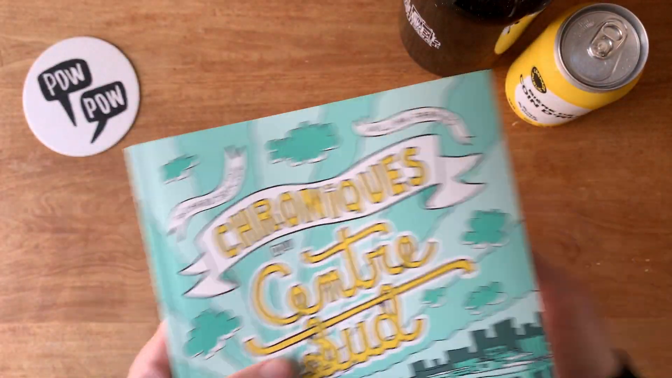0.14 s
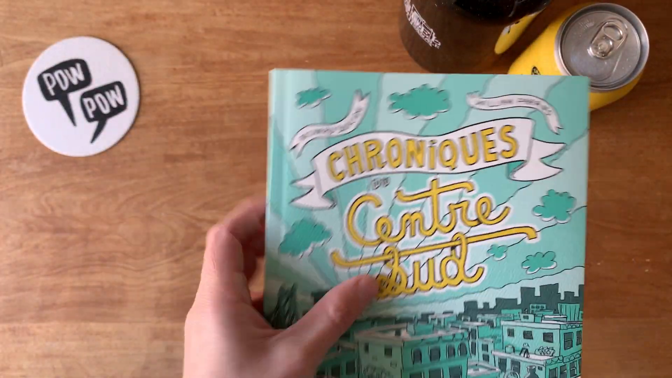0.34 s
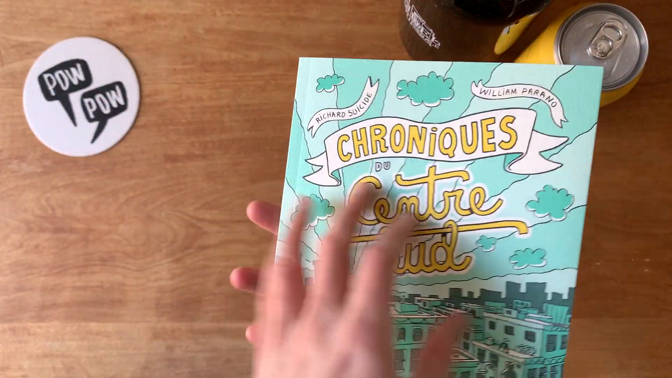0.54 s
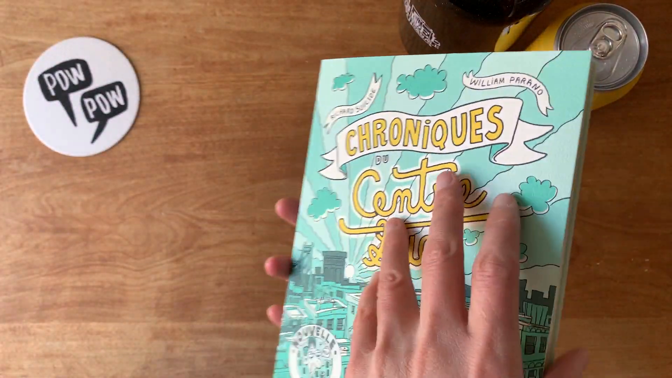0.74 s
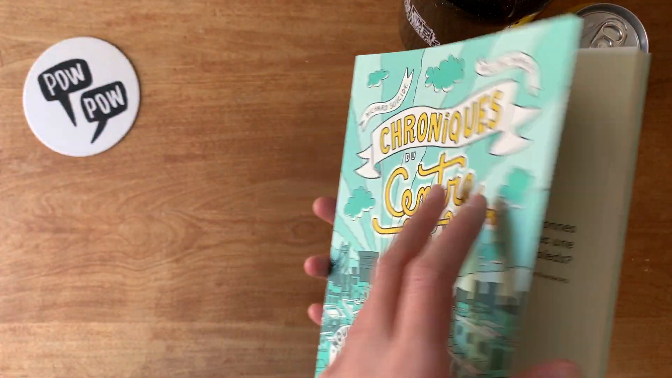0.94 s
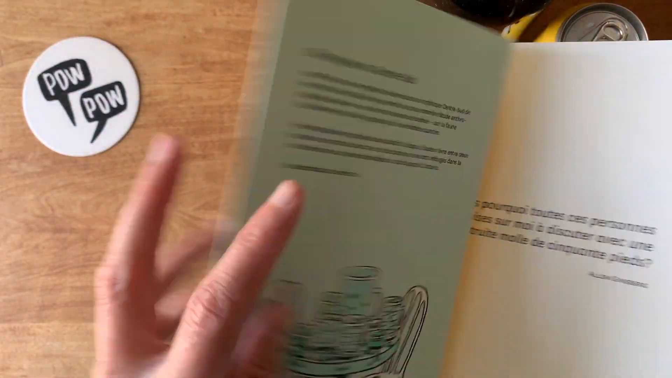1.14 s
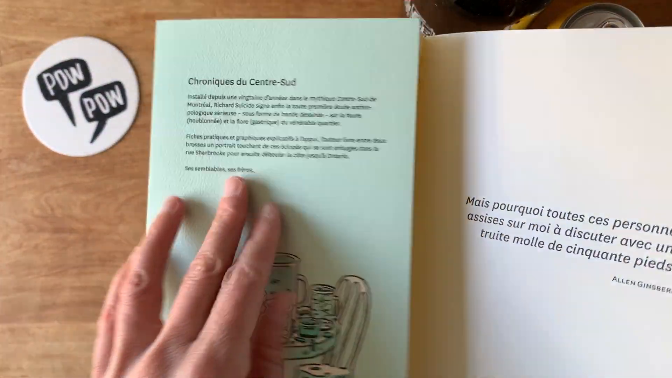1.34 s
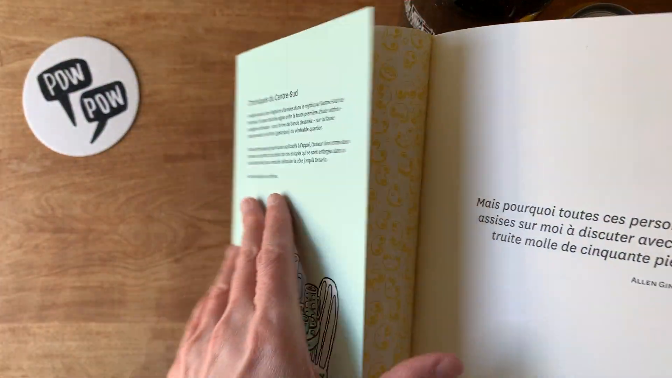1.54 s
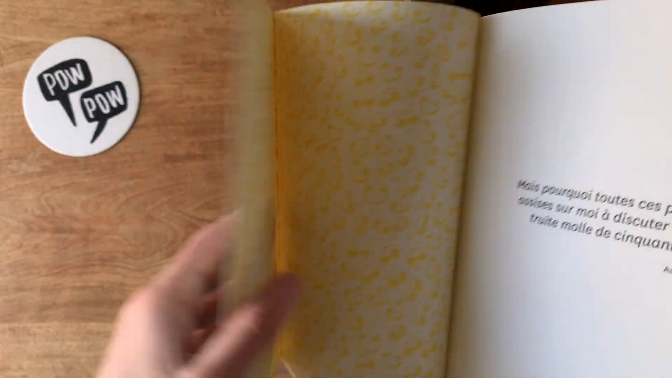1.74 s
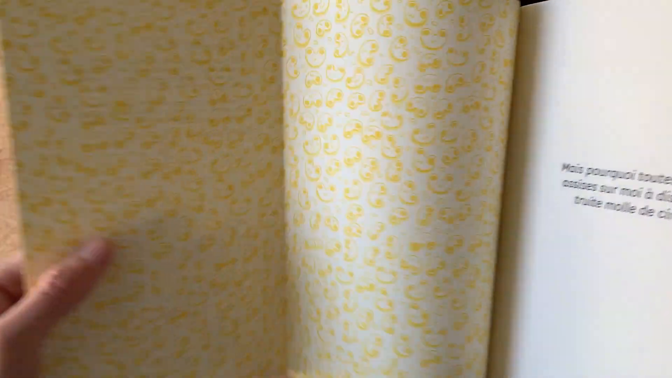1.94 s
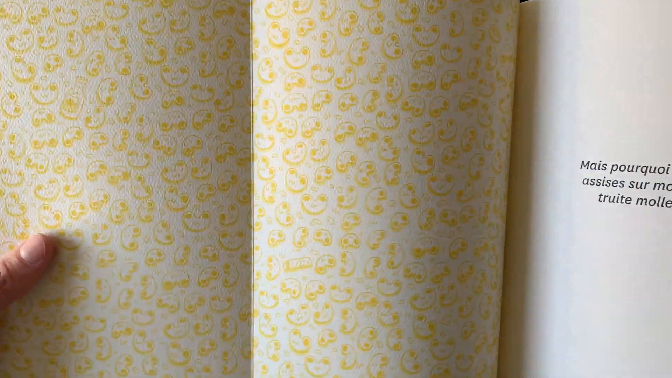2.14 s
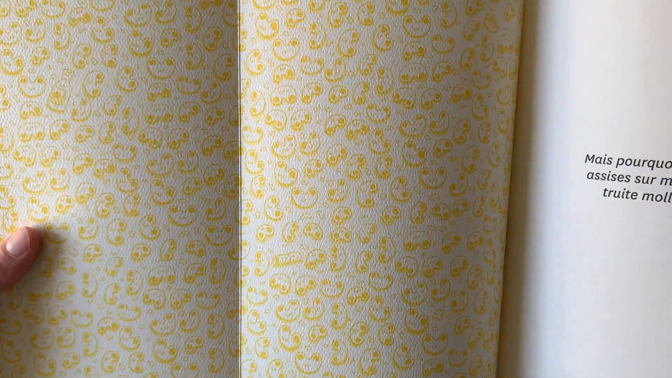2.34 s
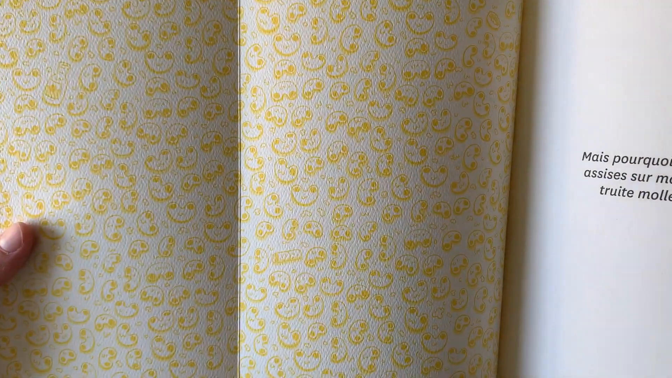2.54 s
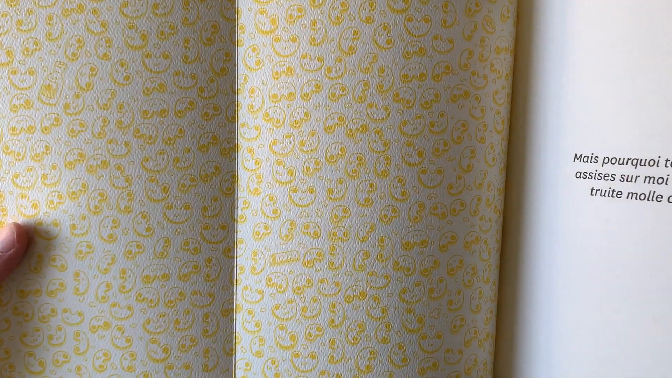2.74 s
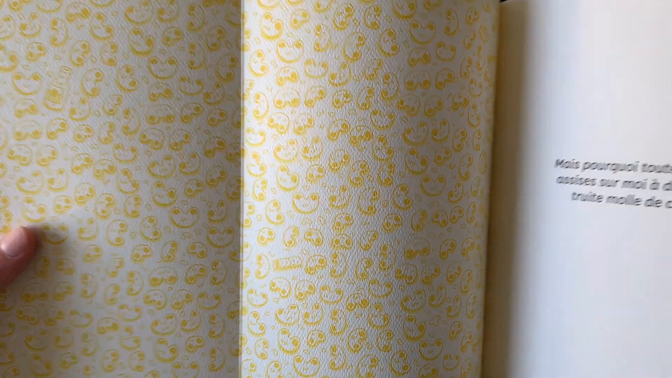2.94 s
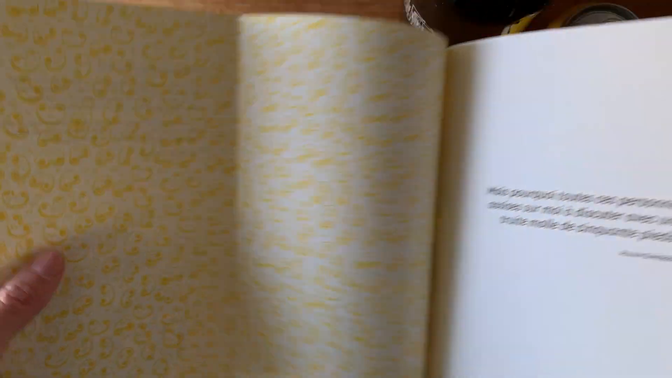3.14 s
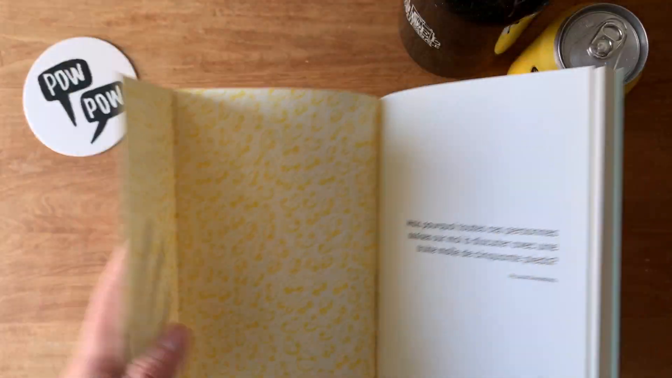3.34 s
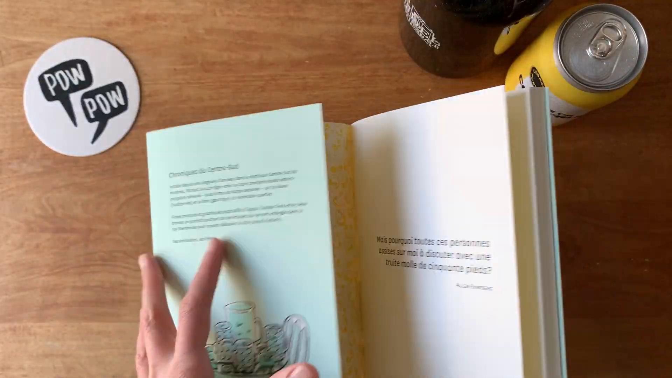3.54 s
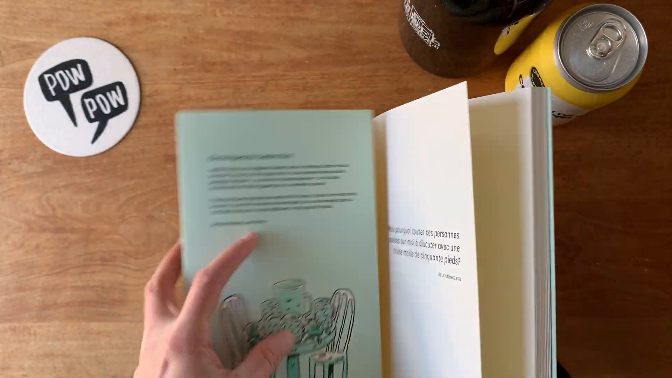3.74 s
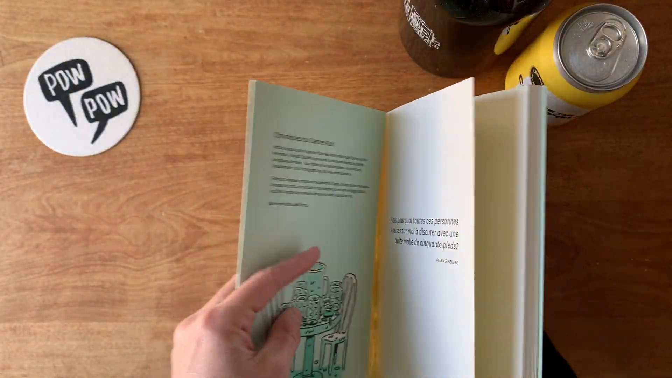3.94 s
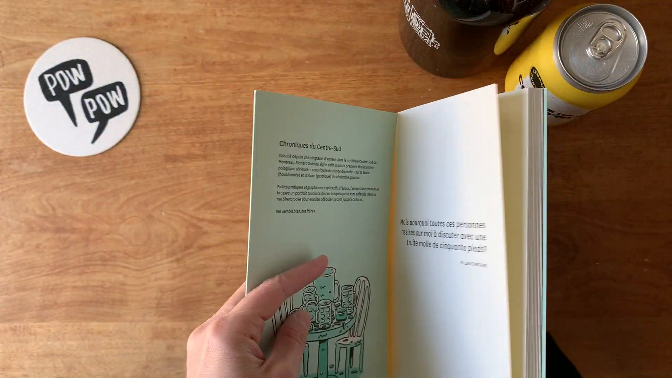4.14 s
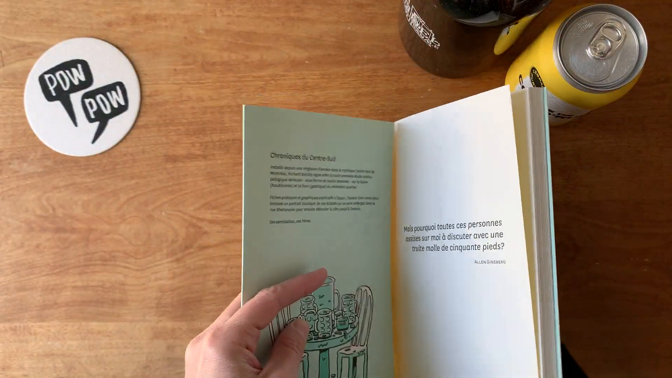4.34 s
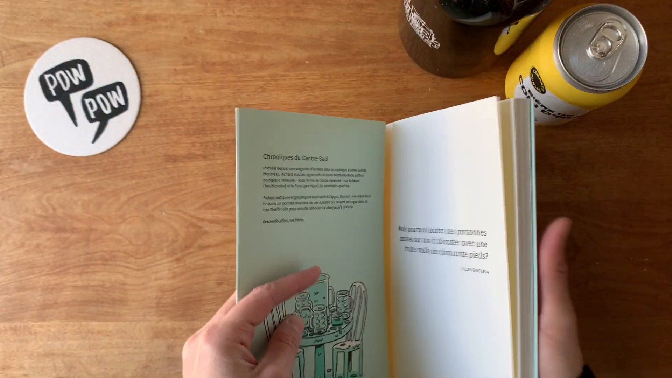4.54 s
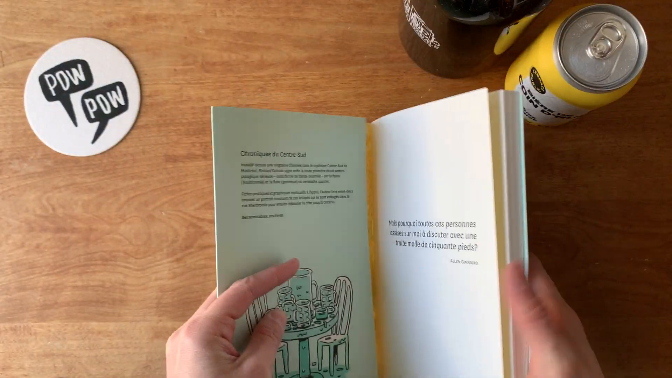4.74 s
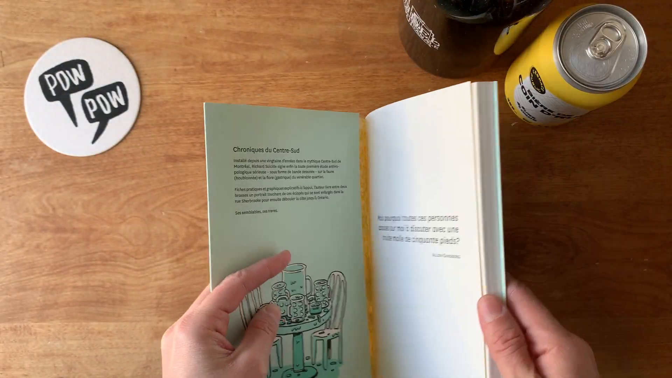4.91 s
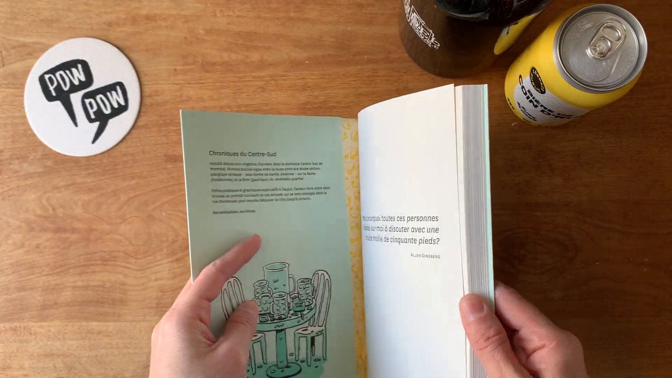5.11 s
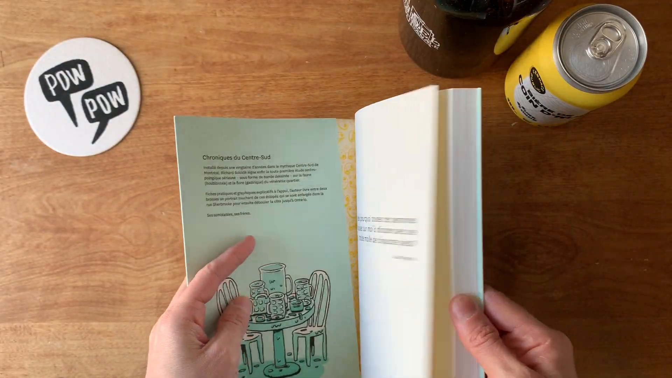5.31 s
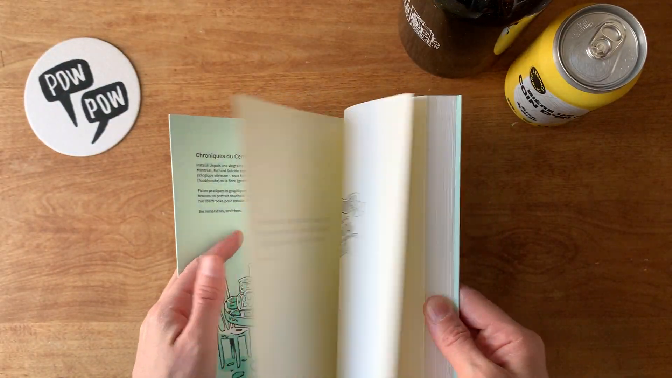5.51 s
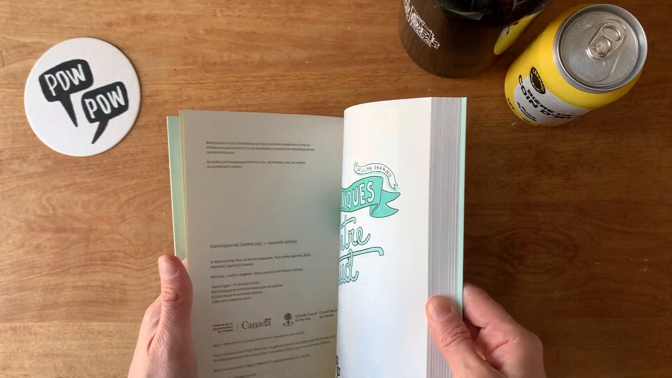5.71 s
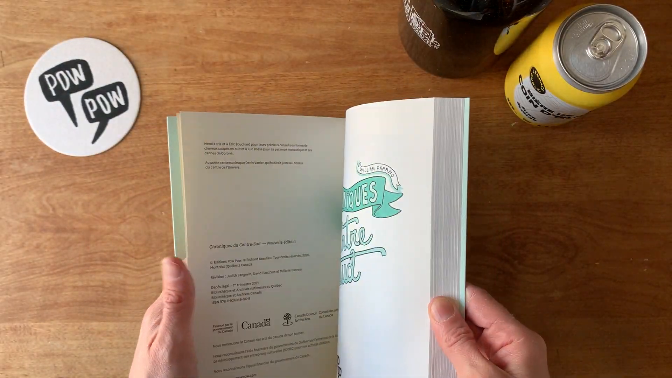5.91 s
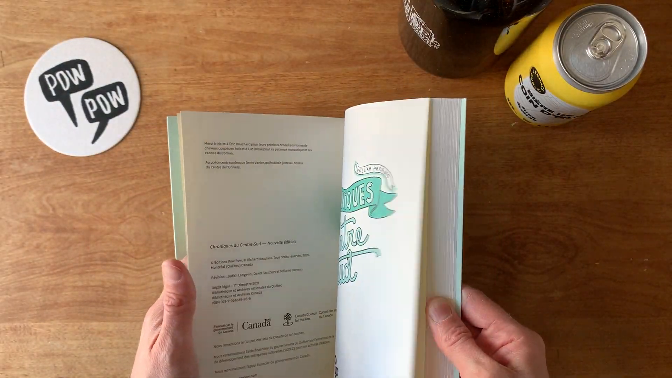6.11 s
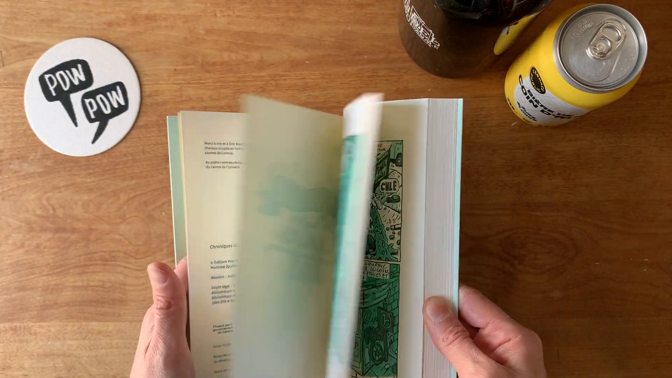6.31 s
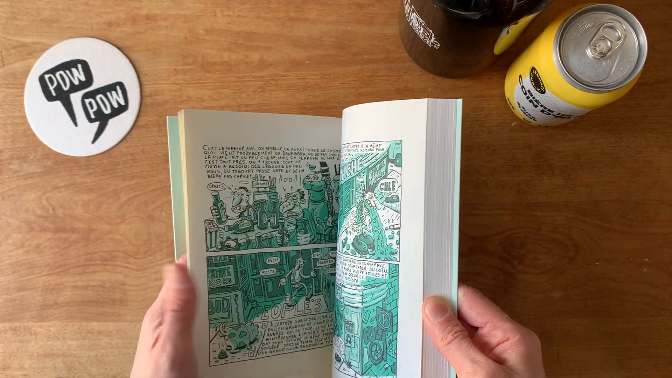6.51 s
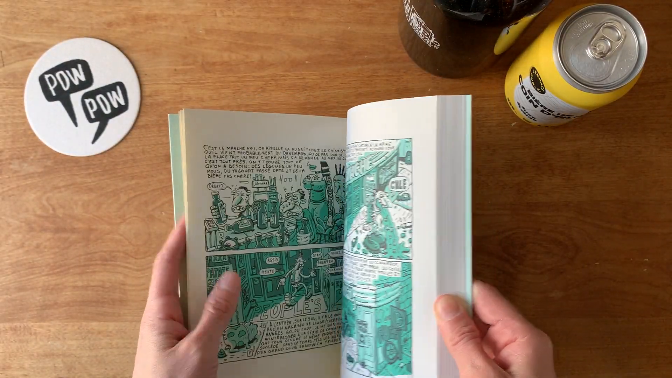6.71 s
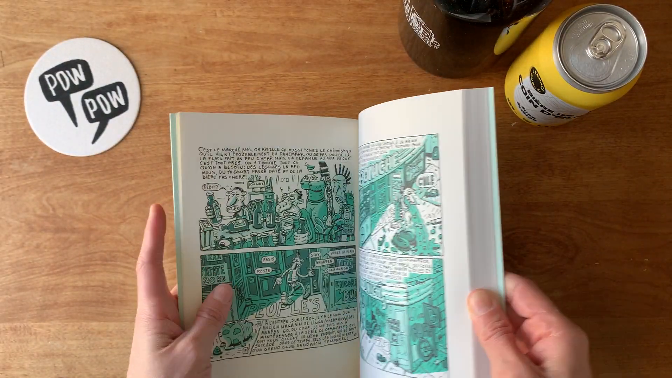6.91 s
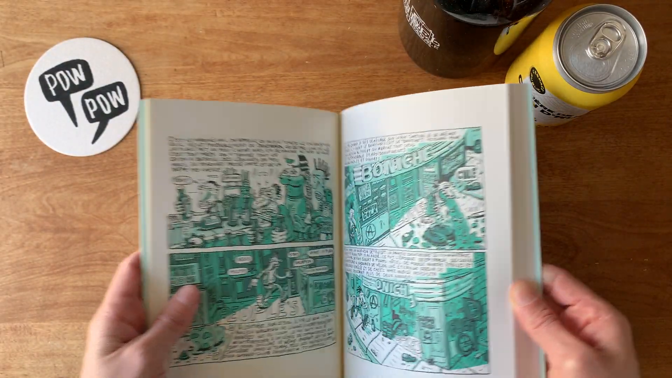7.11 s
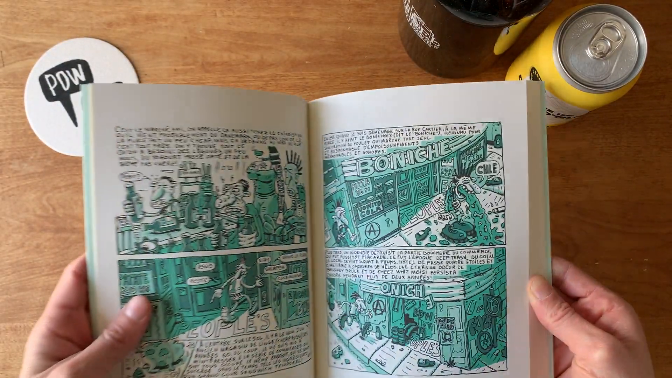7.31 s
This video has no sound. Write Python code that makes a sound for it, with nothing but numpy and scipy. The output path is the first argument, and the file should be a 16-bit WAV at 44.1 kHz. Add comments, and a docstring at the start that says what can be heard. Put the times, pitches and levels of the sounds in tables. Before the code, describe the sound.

Close stereo microphone in a small quiet room with a faint low hum. Fingers rub and brush a paperback's cover, the cover flops open, and pages slide and flap, crackling into a crisp snap about two seconds in. After a near-silent pause, rustling resumes; the book knocks hard on the wooden table, then single pages turn softly with small flaps.

```python
"""A soft rub of fingers on paper over a low hum comes first; then pages flick, slide and flap.
A paperback is opened and leafed through on a wooden table, close to a small stereo microphone.
Sliding is a dense train of tiny slips, coloured by paper and book; freed pages are short noise bursts.
The cover flops open and the book once knocks hard: dispersed thuds, with table and cover modes ringing.
A small room answers with near echoes and a diffuse tail."""
import sys
import numpy as np
from scipy import signal
from scipy.fft import rfft, irfft, next_fast_len
from scipy.io import wavfile

SR = 44100
rng = np.random.default_rng(int(sys.argv[2]) if len(sys.argv) > 2 else 0)


def bounce(signal):
    """Save signal as a 16-bit WAV file at the path given by the first command-line argument."""
    frames = np.transpose(np.atleast_2d(signal))
    limited = np.clip(frames, -1, 1)
    pcm = np.round(limited * 32767).astype(np.int16)
    wavfile.write(sys.argv[1], SR, pcm)


N = 328986
TIME = np.arange(N) / SR

# still room, spectrum of its noise: frequency_hz, level_db
ROOM_NOISE = [(20, -79), (50, -49.5), (90, -46.5), (135, -54), (185, -58), (250, -57.5), (330, -60),
              (470, -68), (650, -69.5), (900, -79.5), (1800, -77), (3800, -82), (6000, -82.5),
              (11500, -80.5), (15500, -88)]
# still room, partials of its hum: frequency_hz, level_db
HUM_PARTIALS = [(59.5, -69.5), (119.8, -69), (161.5, -72), (217.7, -76), (325, -85)]

# soft rub of the fingers while they handle the book: time_s, level_db
FINGER_RUB = [(0.0, -56), (0.56, -95), (0.91, -96), (1.27, -59), (1.99, -76), (2.35, -76.5), (3.05, -86),
              (3.26, -55.5), (3.91, -56), (4.2, -64), (4.45, -57.5), (4.71, -54.5), (5.77, -72),
              (5.88, -86.5), (6.44, -88), (6.77, -74), (7.21, -80), (7.46, -89.5)]
# what the rub sets off, relative to it: hiss_db, sheen_db, sheet_db, drag_db
RUB_LAYERS_DB = (-10, -11, 9.5, 12.5)
# strokes of a hand or page over paper, levels before the layer trims: fastest_at_s, speeding_up_s,
# slowing_down_s, hiss_db, sheen_db (the sheen's level is this plus twice the hiss), sheet_db, drag_db
STROKES = [(.25, 0.13, 0.048, -60.5, -13, -49, -45), (.305, 0.038, 0.12, -49.5, -7, -44.5, -57),
           (0.551, 0.17, 0.14, -44, 6, -44, -48), (0.597, 0.043, 0.036, -32.5, 19, -39.5, -37.5),
           (0.664, 0.1, 0.1, -37, 0, -46, -52), (.875, 0.097, 0.049, -51, -4, -48, -45.5),
           (1.025, 0.036, 0.037, -42, -12, -36, -48), (1.109, 0.05, 0.048, -34, -15, -30.5, -47),
           (1.325, 0.034, 0.036, -38.5, 29.5, -39, -42), (1.52, 0.12, 0.065, -40, 0.5, -41, -38.5),
           (1.586, 0.068, 0.024, -34.5, -5, -52, -53), (1.746, 0.15, 0.2, -40.5, 4, -50, -51),
           (1.841, 0.12, 0.084, -41, 5, -46, -40.5), (1.963, 0.036, 0.019, -37.5, -9, -36.5, -39),
           (2.06, 0.099, 0.098, -46, -10.5, -40.5, -43), (2.34, 0.016, 0.03, -69.5, -14, -56.5, -71),
           (3.06, 0.092, 0.047, -65, -19, -60.5, -52), (3.091, 0.015, 0.058, -48, -14.5, -43, -39),
           (3.25, 0.074, 0.24, -40.5, -5, -57, -44), (3.398, 0.0095, 0.089, -37, -22, -34.5, -34.5),
           (3.585, 0.16, 0.081, -40.5, 2, -44, -37), (3.811, 0.14, 0.06, -39.5, -5, -33.5, -38.5),
           (3.935, 0.033, 0.083, -41.5, -5, -35, -43), (4.045, 0.032, 0.02, -38, -7, -31, -50),
           (4.593, 0.06, 0.037, -36, -3, -34, -40), (4.74, 0.18, 0.21, -45.5, -2.5, -41, -41.5),
           (4.895, 0.088, 0.063, -48, -3, -38, -35), (5.07, 0.047, 0.21, -68, -10, -41.5, -48),
           (5.25, 0.022, 0.026, -54.5, -6, -46, -42), (5.324, 0.01, 0.015, -56, -10, -43.5, -67),
           (5.429, 0.035, 0.045, -65, -19.5, -42.5, -39.5), (5.809, 0.088, 0.049, -76, -20.5, -51, -48),
           (6.059, 0.048, 0.091, -74, -7.5, -57, -69), (6.636, 0.064, 0.033, -49, -17, -37, -52),
           (6.778, 0.042, 0.065, -48, -8, -40, -55.5), (6.88, 0.092, 0.036, -49, -16.5, -43.5, -46),
           (6.999, 0.091, 0.061, -69, -16, -43.5, -40)]
# speed at the two stroke times (dB re the fastest), and the powers that shape the two flanks
STROKE_ENDS_DB, SWELL_POWER, FADE_POWER = -10, 1.4, 1.35
# powers of the speed by which the layers grow: hiss, sheen, sheet, drag
LAYER_SPEED_POWERS = (1.51, 1.25, 1.13, 1.8)
# fibres snapping out of the hiss: mean rate, and level before colouring
CRACKLE_PER_S, CRACKLE_DB = 220, -14
# colours of the sliding layers: frequency_hz, gain_db
HISS_COLOUR = [(900, -23), (2000, -10), (2800, -9.5), (3900, -2.5), (6500, -1), (8500, -6.5), (11000, -5),
               (15000, -13)]
SHEEN_COLOUR = [(4500, -26.5), (7500, -6.5), (9800, 3), (12000, 3.5), (15500, 2.5)]
SHEET_COLOUR = [(250, -29), (500, -13), (800, -3), (1100, -6), (1800, -2), (2600, -3), (3600, -7),
                (7000, -28)]
DRAG_COLOUR = [(40, -4), (90, 2.5), (160, 3), (280, 1), (480, -7.5), (700, -8.5), (1400, -35.5)]
# pitch at which the sliding sheet sings, set by its free length: time_s, pitch_hz
SHEET_PITCH = [(0, 1500), (.65, 1400), (1.02, 1850), (1.13, 1750), (1.25, 1300), (1.55, 1100), (1.8, 1180),
               (2.1, 950), (3.1, 1020), (3.45, 1350), (3.8, 1000), (4.1, 1150), (4.8, 1100), (5.2, 1050),
               (6.1, 1300), (6.63, 1050), (6.85, 1500), (7.4, 1150)]
# resonances of the held pages: frequency_hz, width_hz, gain_db of the peak added to the plain sound
PAGE_RESONANCES = [(444.6, 40, 3), (645, 33, 4), (1025, 45, 3.5), (1250, 16, -8), (1830, 66, -10)]
# gap between the book's low and high resonances
PAGE_GAP_HZ, PAGE_GAP_WIDTH_HZ = 715, 67
# amplitude of the table's reflection against the direct paper sound
STROKE_MIRROR, FLICK_MIRROR = .27, .45

# page edges slipping free, levels before the layer trims: start_s, rise_s, decay_s,
# crack_db (edge), ping_hz (edge), flap_db (sheet), flap_hz (sheet)
FLICKS = [(.082, 0.0027, 0.0027, -51, 3130, -36, 1370), (.285, 0.0054, 0.011, -46.5, 4800, -33.5, 1350),
          (1.181, 0.0051, 0.019, -42, 3900, -31, 1350), (1.287, 0.00045, 0.018, -47.5, 4540, -32, 1390),
          (1.4, 0.0011, .006, -56, 4000, -37, 1100), (1.474, 0.001, 0.019, -39.5, 4060, -38.5, 1250),
          (1.539, 0.022, 0.023, -36.5, 4770, -27, 1040), (1.877, 0.0008, 0.005, -35, 4940, -39.5, 990),
          (1.94, .002, 0.01, -40, 3030, -51, 1250), (1.992, 0.00069, 0.0073, -29, 4840, -27, 1170),
          (2.037, 0.00088, 0.008, -27.5, 2900, -23.5, 1220),
          (2.087, 0.0025, 0.0041, -31, 4110, -23.5, 1090), (2.094, 0.0013, 0.0028, -35, 6370, -27, 990),
          (2.1028, 0.0011, 0.0015, -19.5, 6460, -22.5, 1190), (2.107, 0.0016, 0.0078, -40, 6800, -29, 1250),
          (2.206, 0.003, 0.0037, -53, 3600, -45.5, 1030), (3.386, 0.0037, 0.0076, -38.5, 3390, -39, 1492),
          (3.462, 0.0018, 0.0059, -58, 3400, -37, 1300), (3.505, 0.011, 0.012, -34.5, 2730, -30.5, 1270),
          (3.597, 0.0048, 0.0043, -65, 4000, -32, 1000), (3.726, 0.0026, .008, -56, 3600, -36.5, 1110),
          (3.788, 0.0031, 0.0066, -49, 3600, -25, 880), (4.028, .003, 0.0063, -39.5, 3400, -41, 1400),
          (4.083, 0.0027, 0.0053, -42.5, 4060, -36, 1340), (4.092, 0.0021, 0.024, -79, 3000, -29, 1020),
          (5.049, 0.0018, .008, -56, 6000, -34.5, 1040), (5.061, 0.00092, 0.0098, -52.5, 5900, -33.5, 1000),
          (5.613, 0.0054, 0.021, -43, 3810, -34.5, 1170), (5.626, 0.0057, 0.0089, -46, 4000, -27.5, 1110),
          (5.639, 0.0098, 0.012, -37, 4010, -28, 950), (5.681, 0.0012, 0.005, -35.5, 3640, -28.5, 1290),
          (5.686, 0.0028, 0.019, -44.5, 3450, -19.5, 970), (5.728, 0.011, 0.024, -72, 3040, -29, 915),
          (5.77, .004, 0.029, -50, 3270, -51, 1500), (5.7924, 0.00055, 0.00076, -27, 3230, -23, 1697),
          (5.795, 0.0034, 0.0067, -41.5, 3320, -45, 1720), (6.286, 0.0013, 0.0028, -52.5, 3530, -56, 980),
          (6.476, 0.0054, .012, -81, 3020, -53.5, 620), (6.494, 0.0018, 0.019, -74, 3020, -41.5, 520),
          (7.171, 0.0022, 0.0084, -66, 3000, -48.5, 1205), (7.312, 0.0065, 0.022, -62, 4110, -42.5, 1236),
          (7.345, 0.005, 0.0084, -64, 4000, -46.5, 1300), (7.386, 0.0035, 0.02, -58.5, 4100, -42, 1060)]
# colour of a page edge's crack: frequency_hz, gain_db
CRACK_COLOUR = [(700, -9), (1800, -6.5), (3500, -1.5), (6800, -2.5), (10000, -5), (13000, -12.5),
                (16000, -15.5)]
# colour of a flapping sheet: multiple_of_flap_pitch, gain_db
FLAP_COLOUR = [(.08, -21), (0.201, -9.5), (.33, -6), (.5, -2.5), (.7, -2.5), (1, 2), (1.35, -2),
               (1.848, -5.5), (2.999, -20), (5.999, -44)]

# book meeting table and cover buckling: time_s, blow_db, softness_corner_hz, cover_db, cover_pitch_hz
BLOWS = [(0.292, -28, 258, -45.5, 425), (1.199, -44, 328, -39, 377), (1.225, -44, 258, -37, 372),
         (1.287, -44.5, 600, -38.5, 418), (1.89, -60, 900, -50, 428), (1.958, -54.5, 698, -44, 424),
         (1.989, -44, 500, -41.5, 403), (2.035, -61.5, 1503, -41, 390), (2.085, -58, 1200, -38.5, 425),
         (2.103, -48, 450, -24.5, 426), (4.431, -25.5, 415, -49.5, 410.5), (4.45, -30, 110, -51, 400),
         (4.467, -21, 130, -42.5, 400), (4.5884, -8, 5070, -23.5, 448), (4.5952, -21.5, 1620, -29, 443.6),
         (5.446, -46, 502, -45, 428), (5.689, -53, 450, -41, 444), (6.491, -49, 800, -50.5, 443),
         (7.029, -61, 495, -55, 316)]
# thud of the book on the table, its peak later scaled to 1: frequency_hz, relative_db
THUD_COLOUR = [(24, -58.5), (40, -17), (90, -5.5), (160, -25.5), (235, -17), (320, -3), (500, -2),
               (650, -4), (850, 5), (1300, -4), (1850, -4.5), (2650, -13.5), (3800, -23), (7000, -41)]
# modes of the table top: frequency_hz, level_db (added to the blow), t60_s
TABLE_MODES = [(39.18, -52.5, .7), (88, -27.5, .38), (233, -33, 0.22), (308, -24.5, 0.28),
               (490, -28.5, 0.22), (562.3, -29.5, 0.23), (607, -29, 0.33), (712, -33, 0.39),
               (760.6, -24.5, .23), (850, -25, 0.29), (890, -29.5, .2), (988, -24, 0.17), (1126, -38, .3),
               (1254, -29.5, 0.25), (1427, -33, 0.31), (1426, -35.5, 0.74), (1760, -32, .22),
               (2060, -41, .4), (2090, -39, .5)]
# modes of the cover: multiple_of_cover_pitch, level_db (added to cover_db), t60_s before relaxation
COVER_MODES = [(.27, -11.5, .13), (.48, -20, .08), (.64, -9, 0.09), (.76, -10.5, .06), (.92, -8, .09),
               (1, -1, .11), (1.96, -6, .06)]
# a freshly buckled cover is stiffer: share by which its pitch starts sharp, and its relaxation time
COVER_SHARP, COVER_RELAX_S = .13, .012

# sheet juddering under the finger: loudest_at_s, half_length_s, level_db, pitch_hz, glide_octaves_per_s
JUDDERS = [(.54, 0.013, -52.5, 1350, 1), (1.108, 0.02, -42.5, 1810, -1.1),
           (1.136, 0.0082, -45, 1020, -0.28), (1.49, 0.07, -56.5, 1070, -0.37),
           (1.573, 0.026, -37, 1086, -1.1), (1.76, 0.09, -59.5, 1118, -1.1),
           (1.966, 0.0098, -46.5, 2570, 0.35), (3.41, 0.036, -55.5, 1527, -2.2),
           (3.795, 0.034, -58, 1400, -3.3), (5.587, 0.01, -63.5, 1480, 0.25), (6.635, 0.041, -52, 3200, 0),
           (6.85, 0.066, -59, 3300, 0.71)]
# resonances of the juddering sheet, before each is divided by root multiple: multiple_of_pitch, gain_db
JUDDER_RESONANCES = [(.42, -10), (1.002, 5.5), (1.145, -0.5), (1.65, -11.5)]
JUDDER_WIDTH = 0.044  # share of the resonance's frequency

# near reflections: delay_s, level_db
NEAR_ECHOES = [(.0031, -15), (.0052, -18.5), (.0074, -17.5), (.0093, -11.5), (0.0117, -15.5),
               (.0166, -23.5)]
# decay of the diffuse tail: frequency_hz, t60_s
TAIL_T60 = [(80, .42), (300, .36), (1000, .28), (3000, .34), (7000, .25), (15000, .16)]
# level of the diffuse tail: frequency_hz, level_db
TAIL_LEVEL = [(80, 2), (300, -3), (1000, -5.5), (3000, -9), (7000, -24), (15000, -15.5)]
ROOM_APART = 1.2  # tail that differs between the ports, against the tail they share

# phase by which the left microphone port leads the right: frequency_hz, lead_rad
PORT_LEAD = [(0, 0), (130, .3), (300, 0), (620, -1.4), (1000, -1.1), (1400, 0), (2500, 1.5), (3600, 1.4),
             (4750, 3.14), (9050, 9.42), (13300, 15.7), (16000, 19.7)]
# level of the left port minus the right: frequency_hz, difference_db
PORT_LEVEL = [(80, 1.5), (170, 5), (400, 8), (600, 1.5), (850, -1.5), (2400, -2), (3400, 0), (6000, 0)]
EDGE_HZ = 16050  # upper band limit


def gain_of(db):
    """Logarithmic level: converts decibels to amplitude."""
    return 10 ** (np.asarray(db) / 20)


def evened(x):
    """Mean-square normalisation: scales a signal to unit power."""
    return x / np.sqrt(np.mean(x ** 2) + 1e-20)


def read(points, hz):
    """Logarithmic frequency scale: joins (Hz, value) points by straight lines on it."""
    f, value = np.transpose(points)
    return np.interp(np.log(hz + 1), np.log(f + 1), value)


def add(mix, s, sound):
    """Superposition: adds a sound into the mix from time s."""
    part = mix[max(round(s * SR), 0):][:len(sound)]
    part += sound[:len(part)]


def colour(x, spectrum, size=4096):
    """Minimum phase: a causal filter whose phase follows from its log gain by the Hilbert transform."""
    hz = abs(np.fft.fftfreq(size, 1 / SR))
    log_gain = np.log(gain_of(read(spectrum, hz)))
    kernel = np.fft.ifft(np.exp(np.conj(signal.hilbert(log_gain)))).real
    return signal.oaconvolve(x, kernel[:size // 2])[:len(x)]


def wander(rate_hz):
    """Band-limited chance: smooth noise of unit power, up to about the given rate."""
    hz = np.fft.rfftfreq(N, 1 / SR)
    smooth = rfft(rng.standard_normal(N)) * np.exp(-(hz / rate_hz) ** 2)
    return evened(irfft(smooth, N))


def resonate(x, hz, width):
    """Heterodyne resonance: a one-pole filter, turned up to a pitch that may follow a curve; peak gain 1."""
    turn = np.exp(2j * np.pi * np.cumsum(hz * np.ones(len(x))) / SR)
    r = np.exp(-np.pi * width / SR)
    envelope = signal.lfilter([1 - r], [1, -r], x / turn + 1e-18)
    return 2 * (turn * envelope).real


def slips(per_s, spread_db):
    """Stick-slip: fibres let go in random clicks; positive spread makes a few large, negative a few small."""
    size = gain_of(spread_db * np.minimum(rng.exponential(1, N), 4))
    let_go = rng.random(N) < per_s / SR
    return evened(size * rng.choice([-1., 1.], N) * let_go)


def stillness(apart=0.27):
    """Ambient noise: partly shared by the two channels, under a faint hum that wavers in level and phase."""
    shared = colour(rng.standard_normal(N), ROOM_NOISE)
    unlike = colour(rng.standard_normal(N), ROOM_NOISE)
    unlike = apart * signal.lfilter(*signal.butter(1, 200, "high", fs=SR), unlike)
    hum = np.zeros(N)
    for hz, db in HUM_PARTIALS:
        hum += gain_of(db + 1.8 * wander(3)) * np.sin(2 * np.pi * hz * TIME + .4 * wander(2))
    return np.array([shared + unlike, shared - unlike]) + hum


def stroke_speed(t, speeding_s, slowing_s):
    """Kinematics of a stroke: the hand gathers speed up to t = 0, then slows towards rest."""
    before = np.maximum(-t, 0) / speeding_s
    after = np.maximum(t, 0) / slowing_s
    return gain_of(STROKE_ENDS_DB * (before ** SWELL_POWER + after ** FADE_POWER))


def friction():
    """Power addition: strokes and soft finger rub give the four layer levels in dB."""
    rub_db = np.interp(TIME, *np.transpose(FINGER_RUB))
    power = np.outer(gain_of(RUB_LAYERS_DB), gain_of(rub_db)) ** 2
    for s, speeding_s, slowing_s, hiss_db, sheen_db, sheet_db, drag_db in STROKES:
        during = slice(*np.searchsorted(TIME, [s - 3 * speeding_s, s + 3 * slowing_s]))
        speed = stroke_speed(TIME[during] - s, speeding_s, slowing_s)
        for layer, db in enumerate([hiss_db, hiss_db + sheen_db, sheet_db, drag_db]):
            power[layer, during] += (gain_of(db) * speed ** LAYER_SPEED_POWERS[layer]) ** 2
    return 10 * np.log10(power)


def pages(x):
    """Body resonance: the held sheets favour a few narrow bands, with a gap between the low and the high."""
    x = signal.lfilter(*signal.iirnotch(PAGE_GAP_HZ, PAGE_GAP_HZ / PAGE_GAP_WIDTH_HZ, SR), x)
    out = x.copy()
    for hz, width, db in PAGE_RESONANCES:
        out += gain_of(db) * signal.lfilter(*signal.iirpeak(hz, hz / width, SR), x)
    return out


def off_table(x, delay_s, drift, share):
    """Comb interference: the table mirrors the sound over a path that changes as the page moves."""
    late = delay_s * np.exp(drift * wander(1.5))
    mirrored = np.interp(TIME - late, TIME, x)
    return (x + share * mirrored) / np.hypot(1, share)


def sliding():
    """Stick-slip friction: slips hiss at the contact and shake sheet and book; juddering grip clumps them."""
    hiss_db, sheen_db, sheet_db, drag_db = friction()
    grip = gain_of(2.0 * wander(28) + 1.1 * wander(300))
    fine = grip * slips(per_s=5000, spread_db=0.55)
    coarse = grip * slips(per_s=1500, spread_db=2.0)
    glossy = grip * slips(per_s=22000, spread_db=-1.5)
    crackle = gain_of(CRACKLE_DB) * slips(per_s=CRACKLE_PER_S, spread_db=1.0)
    hiss = colour((fine + crackle) * gain_of(hiss_db), HISS_COLOUR)
    # the hiss level counts again, so the sheen rises more steeply with it
    sheen = colour(glossy * gain_of(hiss_db + sheen_db), SHEEN_COLOUR)
    sheet = pages(colour((coarse + 2 * crackle) * gain_of(sheet_db - 5.0), SHEET_COLOUR))
    singing = resonate(sheet, np.interp(TIME, *np.transpose(SHEET_PITCH)), width=160)
    sheet = sheet + gain_of(-1.5) * singing
    drag = pages(colour(slips(per_s=900, spread_db=2.0) * gain_of(drag_db - 3.5), DRAG_COLOUR))
    paper = off_table(hiss + sheen + sheet, delay_s=0.000905, drift=.25, share=STROKE_MIRROR)
    return gain_of(0.1) * (paper + drag)


def flicking(size=7000):
    """Impulsive release: an edge scrapes free and pings; its sheet flaps, lower when it is larger."""
    edge, sheet, t = np.zeros(N), np.zeros(N), np.arange(size) / SR
    scrape = slips(per_s=15000, spread_db=0.0)
    flutter = slips(per_s=14000, spread_db=-0.2)
    for k, (s, rise, decay, crack_db, ping_hz, flap_db, flap_hz) in enumerate(FLICKS):
        burst = np.minimum(t / rise, 1) * np.exp(-np.maximum(t - rise, 0) / decay)
        crack = colour(burst * scrape[k * size:][:size], CRACK_COLOUR)
        ping = gain_of(7.5) * resonate(crack, ping_hz, width=490)
        add(edge, s, gain_of(crack_db) * (crack + ping))
        shape = [(factor * flap_hz, db) for factor, db in FLAP_COLOUR]
        flap = colour(burst * flutter[k * size:][:size], shape)
        add(sheet, s, gain_of(flap_db) * flap)
    edge = off_table(edge, delay_s=.0004, drift=0.33, share=FLICK_MIRROR)
    return gain_of(-1.15) * edge + gain_of(-2.0) * pages(sheet)


def ring(modes, t):
    """Modal decay: a struck object sounds as a sum of exponentially dying sines."""
    return sum(gain_of(db - 60 * t / t60) * np.sin(2 * np.pi * hz * t) for hz, db, t60 in modes)


def knocking(spread_s=0.0047, settle_s=0.01, settle_db=-29, size=32768):
    """Impact and dispersion: a soft stack loads the table, its leaves patter, and table and cover ring."""
    t, hz = np.arange(size) / SR, np.fft.rfftfreq(size, 1 / SR)
    lead_s = .01  # blank lead, taken off again when the blow is placed
    # bending waves bring the treble first, the bass last; spread_s is the delay at 1 kHz
    bending = np.exp(-4j * np.pi * spread_s * np.sqrt(1000 * hz) - 2j * np.pi * hz * lead_s)
    thud = gain_of(read(THUD_COLOUR, hz)) * bending
    thud /= abs(irfft(thud)).max()
    table = rfft(ring(TABLE_MODES, t)) * bending
    # time that runs fast at first makes the cover start sharp
    relaxing = t + COVER_SHARP * COVER_RELAX_S * (1 - np.exp(-t / COVER_RELAX_S))
    out = np.zeros(N)
    for s, db, soft_hz, cover_db, cover_hz in BLOWS:
        patter = rng.standard_normal(size) * t / settle_s * np.exp(-t / settle_s)
        settling = rfft(gain_of(settle_db) * patter)
        modes = [(factor * cover_hz, part_db, t60) for factor, part_db, t60 in COVER_MODES]
        cover = rfft(ring(modes, relaxing)) * bending
        blow = gain_of(db) * (thud * (1 + settling) + table) + gain_of(cover_db) * cover
        softness = 1 / (1 + 1j * hz / soft_hz) ** 2
        add(out, s - lead_s, irfft(blow * softness))
    return out


def scraping(size=16384):
    """Coarse stick-slip: catches ring the sheet, whose pitch slides as its free length changes."""
    out, t = np.zeros(N), (np.arange(size) - size // 2) / SR
    catches = slips(per_s=900, spread_db=2.0)
    for k, (s, half_s, db, hz, glide) in enumerate(JUDDERS):
        speed = stroke_speed(t, half_s, half_s)
        pitch = hz * 2 ** (glide * t)
        clicks = catches[k * size:][:size]
        tone = np.zeros(size)
        for factor, part_db in JUDDER_RESONANCES:
            part = resonate(clicks, factor * pitch, JUDDER_WIDTH * factor * hz)
            tone += gain_of(part_db) * part / np.sqrt(factor)
        tone = signal.lfilter(*signal.butter(2, [hz / 4, 2 * hz], "band", fs=SR), tone)
        add(out, s + t[0], gain_of(db) * speed * evened(tone))
    return out


def room_tail(size=24000, count=1200):
    """Diffuse decay: sparse reflections of random sign, each band dying at its own speed."""
    taps = np.zeros(size)
    places = np.arange(count) * (size // count) + rng.integers(0, size // count, count)
    taps[places] = rng.choice([-1., 1.], count)
    taps *= np.minimum(np.arange(size) / SR / 0.05, 1)  # builds up over 0.05 s
    hz, t, z = signal.stft(taps, SR, nperseg=256)
    decay = gain_of(-60 * t / read(TAIL_T60, hz)[:, None])
    level = gain_of(read(TAIL_LEVEL, hz))[:, None]
    decay *= level / np.sqrt(count * np.mean(decay ** 2, 1, keepdims=True))
    return signal.istft(z * decay, SR)[1][:size]


def room(x, apart=ROOM_APART, aside=0.18):
    """Early and late reflection: echoes from alternate sides, then a tail unlike at the ports above the bass."""
    dull = signal.lfilter(*signal.butter(1, 5000, fs=SR), x)
    shared = x + signal.oaconvolve(x, room_tail())[:N] / np.hypot(1, apart)
    unlike = apart * signal.oaconvolve(x, room_tail())[:N] / np.hypot(1, apart)
    for k, (s, db) in enumerate(NEAR_ECHOES):
        add(shared, s, gain_of(db) * dull)
        add(unlike, s, (-1) ** k * aside * gain_of(db) * dull)
    unlike = signal.lfilter(*signal.butter(1, 300, "high", fs=SR), unlike)
    return np.array([shared + unlike, shared - unlike])


def scene():
    """Superposition: the book's sounds as the room answers them, over the still room."""
    book = sliding() + flicking() + knocking() + scraping()
    return stillness() + room(book)


def record(dry):
    """Two-port reception: the ports differ in phase and level; then a rumble filter and a band limit."""
    size = next_fast_len(N + SR // 10)
    hz = np.fft.rfftfreq(size, 1 / SR)
    lead = np.interp(hz, *np.transpose(PORT_LEAD))
    balance = gain_of(read(PORT_LEVEL, hz))
    # the mean power of the two ports stays 1
    ports = np.array([balance, np.exp(-1j * lead)]) / np.sqrt((1 + balance ** 2) / 2)
    heard = irfft(rfft(dry, size) * ports, size)[:, :N]
    heard = signal.sosfilt(signal.butter(6, 35, "high", fs=SR, output="sos"), heard)
    band_limit = signal.firwin(511, EDGE_HZ, window=("kaiser", 9), fs=SR)
    return signal.oaconvolve(heard, band_limit[None], "same")


dry = scene()
out = record(dry)
bounce(out)
```